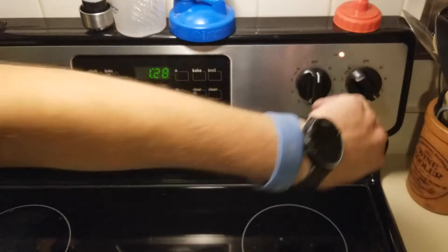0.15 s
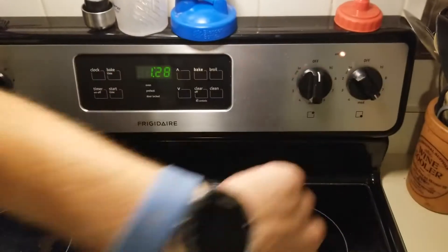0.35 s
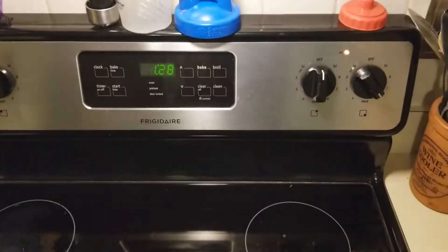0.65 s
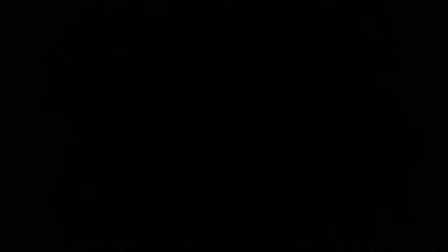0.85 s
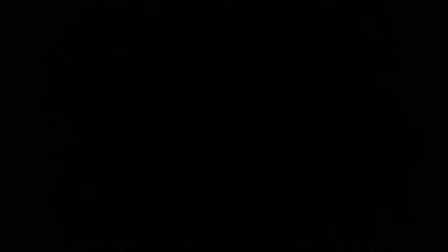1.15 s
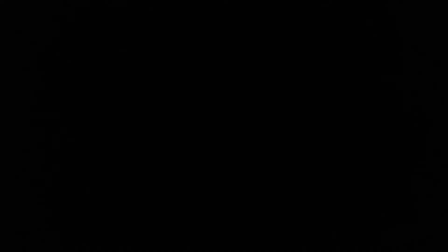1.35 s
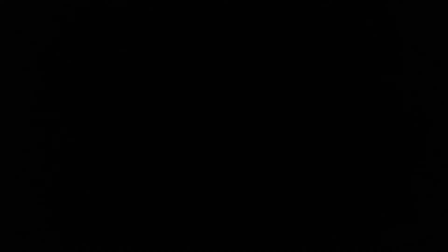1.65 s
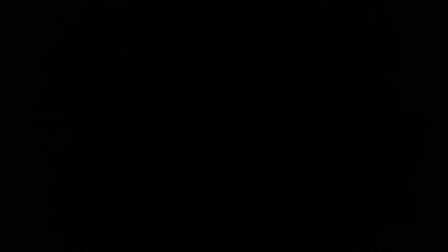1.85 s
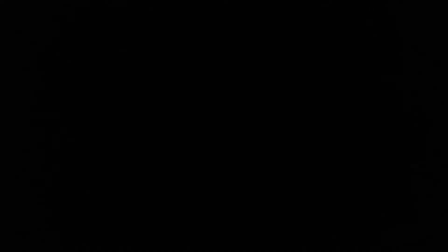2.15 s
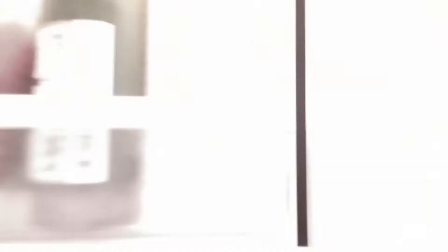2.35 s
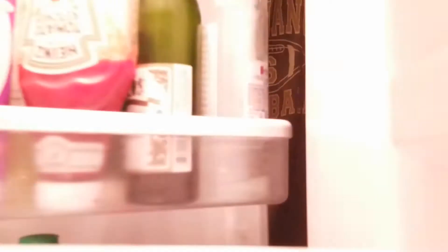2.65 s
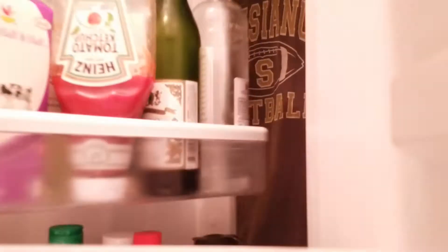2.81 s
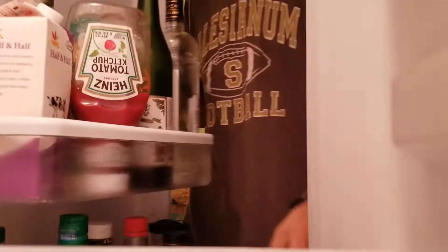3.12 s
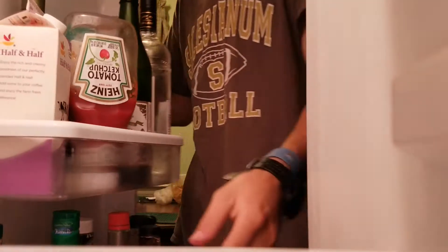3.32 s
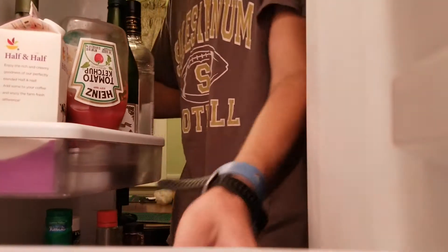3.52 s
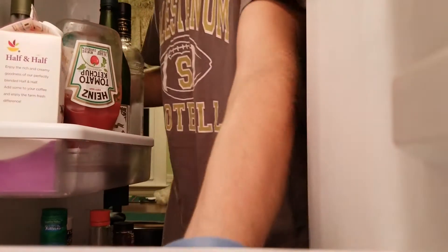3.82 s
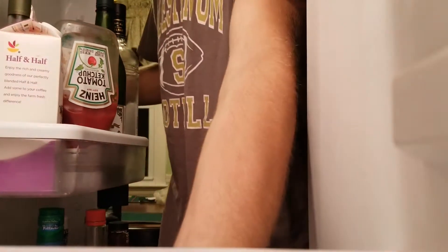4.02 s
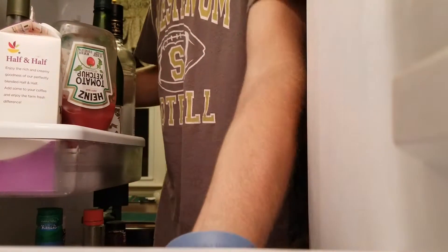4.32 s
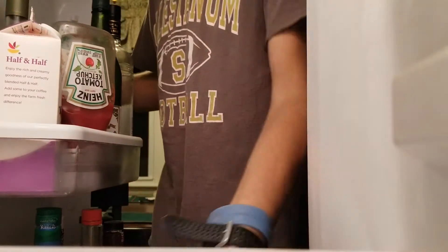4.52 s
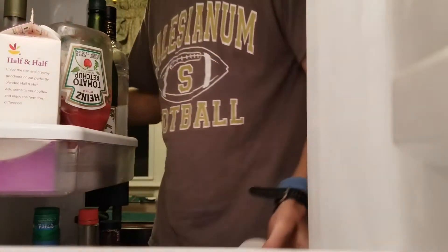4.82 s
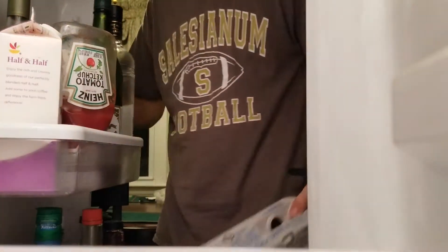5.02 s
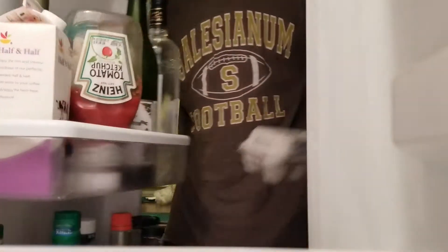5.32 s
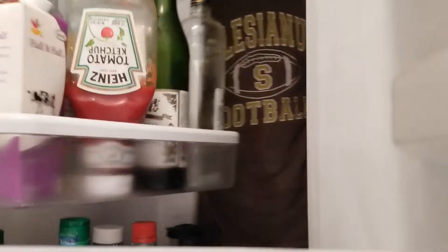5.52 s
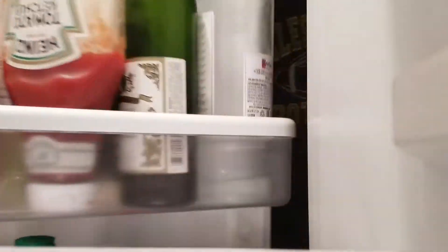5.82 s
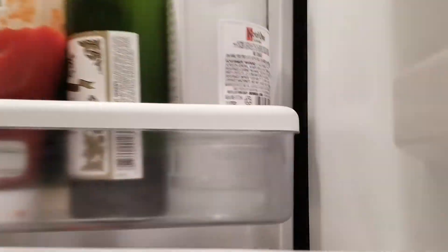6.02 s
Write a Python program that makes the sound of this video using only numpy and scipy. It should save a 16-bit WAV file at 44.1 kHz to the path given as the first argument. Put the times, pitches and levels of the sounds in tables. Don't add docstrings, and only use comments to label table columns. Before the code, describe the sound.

Heard closely from a fridge shelf after a short, quiet kitchen opening: steady compressor hum, fan air and a faint high whine. Muffled knocks build to a heavy door jolt with a dense burst of bottle rattles and bright ticks. Calmer hum follows with sleeve rustle, then a pulp carton knocks, rubs and drags in short pulls, ending in a solid bump. Light nudges precede the closing thud and glassy rattle.

```python
import sys
import numpy as np
from scipy import signal
from scipy.fft import rfft, irfft, next_fast_len
from scipy.io import wavfile
from scipy.ndimage import uniform_filter1d

SR = 44100
rng = np.random.default_rng(int(sys.argv[2]) if len(sys.argv) > 2 else 0)


def rack_gain(trim_db):
    fader = np.asarray(trim_db, float)
    return 10 ** (fader / 20)


def output_pcm(signal):
    pcm = np.clip(np.atleast_2d(signal).T, -1, 1) * 32767
    wavfile.write(sys.argv[1], SR, np.round(pcm).astype(np.int16))


N = 271563
T = np.arange(N) / SR
INSIDE_S = .822
OPEN_S, SHUT_S = 2.38, 6.14
PORT_LAG = 18


def curve(table, hz):
    f, v = np.transpose(table)
    return np.interp(np.log(np.maximum(hz, 1)), np.log(np.maximum(f, 1)), v)


def walk(rate):
    k = int(SR / rate)
    held = np.repeat(rng.standard_normal(N // k + 1), k)
    return 1.2 * uniform_filter1d(uniform_filter1d(held, k), k)[:N]


def pair(alike, lag=0):
    mid, side = rng.standard_normal((2, N))
    a = np.sqrt((1 + alike) / 2) * mid
    b = np.sqrt((1 - alike) / 2) * side
    return np.array([a + b, np.roll(a - b, lag)])


def grit(spread_db, density):
    k = max(int(SR / density), 1)
    grain_db = spread_db * np.minimum(rng.exponential(size=N // k + 1), 2.5)
    g = np.repeat(rack_gain(grain_db), k)[:N]
    return g / np.sqrt(np.mean(g ** 2))


def ring(x, modes, body=0.035):
    size = next_fast_len(N + SR // 2)
    hz = np.fft.rfftfreq(size, 1 / SR) + 1e-3
    h = 0
    for k, (f, width, db) in enumerate(modes):
        pole = 1 / (1 + 1j * (hz / f - f / hz) * f / (2.34 * width))
        h = h + (-1) ** k * rack_gain(db) * pole * (pole + body)
    return irfft(rfft(x, size) * h / np.sqrt(np.mean(abs(h) ** 2)), size)[..., :N]


def moves(rows, mix_db=0):
    out = np.zeros(N)
    for s, attack, hold, release, db in rows:
        ramp = np.minimum((T - s) / attack - 1, (s + attack + hold - T) / release)
        out += (T > s) * rack_gain(db + 25 * np.minimum(ramp, 0)) ** 2
    return rack_gain(np.reshape(mix_db, (-1, 1))) ** 2 * out


def struck(rows, rise_cycles, sag):
    out, t = np.zeros(N + SR), np.arange(SR // 2) / SR
    for s, db, hz, t60 in rows:
        phase = 2 * np.pi * hz * (t + sag * t60 / 8 * (1 - np.exp(-8 * t / t60)))
        envelope = rack_gain(db - 60 * t / t60) * (1 - np.exp(-t * hz / rise_cycles))
        out[int(s * SR):][:len(t)] += envelope * np.sin(phase)
    return out[:N]


def liner(x):
    t60_s, walls_db = .05, -4
    t = np.arange(int(t60_s * SR)) / SR
    walls = rng.standard_normal((2, len(t))) * rack_gain(-60 * t / t60_s) * (t > .001)
    walls *= rack_gain(walls_db) / np.sqrt(np.sum(walls ** 2, axis=1, keepdims=True))
    direct = np.array([x, .9 * np.roll(x, PORT_LAG)])
    reflected = signal.fftconvolve(x[None], walls, axes=1)[:, :N]
    return (direct + reflected) / np.hypot(1, rack_gain(walls_db))


# pitch_hz, likeness (0-1)
ALIKE = [(60, 1), (130, .98), (290, .95), (640, .65), (1400, 0)]


def air(spectrum, db, flicker_db):
    hz, out = np.fft.rfftfreq(N, 1 / SR) + 1e-3, 0
    mid, side = rfft(rng.standard_normal((2, N))) * rack_gain(curve(spectrum, hz))
    c = curve(ALIKE, hz)
    both = np.sqrt(1 + c) * mid + np.sqrt(1 - c) * side * np.array([[1], [-1]])
    for centre in 25 * 2. ** np.arange(10):
        band = np.cos(np.pi / 2 * np.clip(np.log2(hz / centre), -1, 1)) ** 2
        out = out + irfft(both * band, N) * rack_gain(flicker_db * walk(5.2))
    return out * rack_gain(db) / np.sqrt(np.mean(out.mean(axis=0) ** 2))


# pitch_hz, density_db (per Hz)
KITCHEN_AIR = [(20, -32), (45, -8), (62, -5), (90, -17.5), (134, -27), (170, -16.5), (242, -13.5),
               (354, -11.5), (575, -26.5), (1190, -29.5), (1700, -42.5), (4000, -39.5), (8000, -47),
               (16000, -43.5)]
# pitch_hz, density_db (per Hz)
CABINET_AIR = [(20, -30), (48, -12), (74, -1), (94, 6.5), (135, -13.5), (212, 3.5), (363, -17.5),
               (624, -13.5), (1300, -28.5), (2160, -38.5), (3300, -39), (5000, -57), (13600, -44),
               (16000, -50)]


def room_and_fan(inside):
    return (1 - inside) * air(KITCHEN_AIR, -59.5, 1.0) + inside * air(CABINET_AIR, -48, 0.9)


# time_s, level_db
SHAFT_HUM = [(.83, -33), (1.01, -35), (1.56, -32.5), (2.12, -34.5), (2.61, -30), (2.87, -36.5), (3.77, -40),
             (4.47, -39.5), (5.3, -38.5), (5.83, -30), (6.16, -34.5)]
# pitch_hz, kitchen_db, door_shut_db, door_open_db
TONES = [(119.2, -58.5, -84, -48), (162.5, -84, -55.5, -62), (244.8, -66, -56.5, -57.5),
         (295, -81, -64.5, -57), (81.5, -74, -60, -52.5), (474, -82, -65.5, -64)]
SHAFT_HZ, CABINET_HZ = 59.75, 206.3


def compressor(inside):
    def tone(hz, db, waver_db, drift):
        level = np.sqrt(2) * rack_gain(db + waver_db * walk(11))
        return level * np.sin(2 * np.pi * hz * T + drift * walk(5) + 6 * rng.random())

    door = np.clip(np.minimum((T - OPEN_S) / 0.16, (SHUT_S - T) / 0.71), 0, 1)

    def by_place(kitchen, shut, wide):
        return kitchen + (shut - kitchen) * inside + (wide - shut) * door

    kitchen_hum_db = -51.5
    shaft_db = kitchen_hum_db + (np.interp(T, *np.transpose(SHAFT_HUM)) - kitchen_hum_db) * inside
    out = tone(SHAFT_HZ, shaft_db, 0.39, 0.55)
    out += tone(CABINET_HZ, by_place(-72, -44.5, -42.5), 1.35, 0.52)
    for hz, *levels_db in TONES:
        out += tone(hz, by_place(*levels_db), 1.2, .5)
    return out


def coil_whine(inside):
    whine_hz, kitchen_db, cabinet_db = 4571, -75.5, -78
    opened = T > OPEN_S
    db = kitchen_db + (cabinet_db - kitchen_db) * inside - 0.72 * inside
    db = db + 1.5 * (1.5 + opened) * walk(16)
    throb_kitchen, throb_shut, throb_open = 0.14, 0.45, 0.2
    depth = throb_kitchen + (throb_shut - throb_kitchen) * inside + (throb_open - throb_shut) * opened
    depth = depth + 0.13 * inside * walk(6.3)
    turn = np.exp(2j * np.pi * SHAFT_HZ * T + .9j * walk(8.8))
    blur = 1.1 * walk(9) + 1.15 * opened * walk(150)
    carrier = np.exp(2j * np.pi * whine_hz * T + 1j * blur)
    throbbing = carrier * (1 + depth * (turn + 0.58 * turn ** 2 + 0.25 / turn))
    return np.sqrt(2) * rack_gain(db) * np.real(throbbing)


# start_s, attack_s, hold_s, release_s, level_db
SLEEVES = [(-.1, 0.37, .1, 0.52, -77), (1.5, 0.046, 0.017, 0.052, -68.5), (1.95, 0.013, 0.05, 0.049, -51),
           (2.6, 0.031, .1, 0.36, -78), (3.125, 0.0089, .015, 0.04, -69.5),
           (3.17, 0.039, 0.052, 0.12, -73.5), (3.33, 0.046, 0.043, .15, -71), (4.8, .03, .06, 0.28, -76),
           (5.0, 0.12, 0.089, 0.1, -71), (5.283, .004, .008, .04, -68), (5.295, 0.011, 0.025, 0.18, -71),
           (5.7, 0.074, 0.037, 0.13, -72.5)]
# pitch_hz, width_hz, level_db
RUSTLE = [(3900, 930, 1), (5200, 2280, -0.5), (6560, 1010, 5), (7310, 680, -1.5)]


def rustling(crack, rustle):
    cloth = moves(SLEEVES)[0] + (T > INSIDE_S) * rack_gain(-81.5) ** 2
    power = 0.4 * crack + (rustle + cloth) * rack_gain(2.2 * walk(35))
    return rack_gain(3.5) * ring(np.sqrt(power) * grit(2.0, 300) * pair(0.034), RUSTLE)


# pitch_hz, width_hz, level_db
CUFF = [(3560, 620, 7), (6700, 1100, -9)]
# start_s, attack_s, hold_s, release_s, level_db
CUFF_SWISH = [
    (0.203, 0.18, .04, .12, -73),
]


def cuff():
    return ring(np.sqrt(moves(CUFF_SWISH)[0]) * pair(.3), CUFF)


# pitch_hz, width_hz, level_db
DUCT = [(436, 15, 4), (640, 56, -6.5), (1293, 40, -9.5), (1414, 42, -21.5), (1910, 44, -23),
        (2450, 71, -33), (2660, 42, -27.5)]


def duct(inside):
    db = np.where(T < OPEN_S, -57.5, -65) + 1.1 * walk(4)
    return ring(inside * rack_gain(db) * pair(0.7), DUCT)


# start_s, shelf_db, pitch_hz (strongest ring), glass_db, crack_db
DOOR_KNOCKS = [(.829, -41, 670, -63, -82.5), (.996, -23, 421, -62, -87), (1.079, -20, 474, -34, -42),
               (1.151, -38.5, 950, -43, -31.5), (1.522, -24, 547, -58.5, -49.5),
               (1.545, -28, 436, -52, -62.5), (1.799, -38.5, 628, -53, -79),
               (1.946, -23.5, 539, -30.5, -78), (1.959, -16.5, 447, -26, -53),
               (2.035, -25, 1930, -23, -19.5), (2.121, -20, 640, -45, -33), (2.151, -20, 410, -33, -35),
               (2.205, -29.5, 450, -48, -35), (2.213, -20.5, 425, -33.5, -51),
               (2.246, -36, 425, -67, -33.5), (2.316, -26, 830, -33.5, -38),
               (2.334, -25.5, 492, -37.5, -47.5), (2.443, -34.5, 586, -50, -37.5),
               (2.465, -52, 470, -39, -38.5), (5.998, -21.5, 806, -24.5, -32), (6.03, -38, 497, -32, -33)]
# start_s, shelf_db, pitch_hz (strongest ring), glass_db, crack_db
HAND_KNOCKS = [(2.55, -43.5, 710, -60, -84), (2.622, -41, 602, -63, -85), (2.708, -45, 696, -61, -87),
               (3.0, -37.5, 720, -54.5, -67), (3.457, -39.5, 590, -57.5, -73),
               (3.661, -38.5, 442, -49, -44), (3.777, -26, 1116, -41.5, -49), (3.863, -35, 740, -60, -40),
               (3.931, -28, 1150, -43, -49), (4.035, -36.5, 474, -44.5, -46), (4.191, -31, 868, -49, -42.5),
               (4.307, -23.5, 455, -44.5, -50.5), (4.519, -23, 467, -41, -40), (4.556, -30, 282, -62, -67),
               (4.581, -19.5, 542, -55, -64), (5.172, -33.5, 687, -68, -60), (5.585, -40, 618, -71, -86),
               (5.767, -37, 455, -61, -80)]
RATTLE_T60_S = 0.13


def knocks():
    env, t = np.zeros((3, N + SR)), np.arange(SR // 2) / SR
    slower = np.array([[.9], [.9], [.8]])
    rise_s = np.array([[.0008], [.0006], [.0003]])
    snap = np.array([[2.5], [1.5], [.4]])
    for s, shelf_db, hz, glass_db, crack_db in DOOR_KNOCKS + HAND_KNOCKS:
        shelf_t60 = RATTLE_T60_S + 0.0172 * max(-23 - shelf_db, 0)
        t60 = np.array([[shelf_t60], [RATTLE_T60_S], [RATTLE_T60_S]])
        decay = rack_gain(-60 * t / (t60 * slower)) + snap * np.exp(-t / (2.0 * rise_s))
        shape = (1 - np.exp(-t / rise_s)) * decay
        db = np.array([[shelf_db - 8.5], [glass_db - 9.0], [crack_db - 8.5]])
        env[:, int(s * SR):][:, :len(t)] += (rack_gain(db) * shape) ** 2
    return env[:, :N]


# start_s, attack_s, hold_s, release_s, level_db
NUDGES = [
    (.823, 0.003, 0.053, 0.39, -47.5),
    (2.35, .05, 0.28, 0.43, -63),
    (5.13, 0.036, 0.017, 0.35, -46),
    (5.74, 0.039, 0.033, 0.11, -48),
    (2.8, .01, 0.023, 0.07, -55),
]
# from_s, then rows of pitch_hz, width_hz, level_db
SHELF = [
    (0, [(395, 170, -1), (790, 70, 12), (1050, 210, 0.5), (1654, 110, 4.5), (2750, 700, -24)]),
    (.97, [(344, 153, 4.5), (445, 79, 9), (640, 54, 4.5), (786, 54, 2.5), (970, 96, -3), (1210, 340, -9), (1440, 200, -6.5)]),
    (3.6, [(314, 210, -14.5), (464, 23, 4), (639, 23, -6), (771, 24, -1), (920, 91, -13), (1146, 42, -5.5), (1320, 67, -14), (1590, 150, -15.5)]),
    (4.17, [(425, 80, -6), (660, 37, -16), (740, 16, -0.5), (882, 33, 0.5), (1123, 55, -7), (1340, 105, -18)]),
    (4.45, [(370, 240, -15), (486, 41, 2), (645, 35, 2), (803, 89, -3), (978, 16, 4), (1105, 58, 3), (1365, 51, -5), (1684, 93, -12)]),
    (5.0, [(453, 250, 1.5), (637, 49, 5.5), (760, 32, 3), (1060, 54, -17), (1140, 37, 2)]),
]


def shelves(knock, drag, slips):
    murmur = moves(NUDGES)[0] + (T > INSIDE_S) * rack_gain(-59.5) ** 2
    drive = np.sqrt(knock + (drag + murmur) * slips ** 2) * pair(.65, lag=PORT_LAG)
    ends = [s for s, modes in SHELF[1:]] + [N / SR]
    return sum(ring(drive * ((T >= s) & (T < end)), modes) for (s, modes), end in zip(SHELF, ends))


# pitch_hz, width_hz, level_db
GLASS = [(1624, 170, -2), (1953, 98, 2.5), (2075, 190, -5), (2367, 130, -7.5), (2520, 54, -2),
         (2990, 31, -13.5), (3070, 184, 0.5), (4120, 36, -28), (4460, 20, -10), (3104, 830, -5.5)]


def bottles(knock, drag, slips):
    return rack_gain(2.5) * ring(np.sqrt(knock + drag * slips ** 2) * pair(0.072, lag=PORT_LAG), GLASS)


# pitch_hz, width_hz, level_db
HISS = [(10350, 3600, -2), (12460, 1230, 4), (13700, 1200, -1.5)]


def contact_hiss(crack, hiss):
    bright = np.where((T > 1.9) & (T < 5.9), .4, .03)
    power = bright * crack + hiss * rack_gain(4.8 * walk(30))
    return ring(np.sqrt(power) * grit(2.1, 300) * pair(0.098), HISS)


# start_s, attack_s, hold_s, release_s, level_db
SHUDDERS = [
    (.83, 0.065, 0.31, 0.26, -44),
    (1.45, 0.087, 0.014, 0.14, -34.5),
    (1.9, 0.085, 0.023, 0.29, -24),
    (2.0, 0.11, 0.066, 0.85, -32),
    (4.47, 0.031, 0.048, 0.23, -37.5),
    (5.93, 0.057, .01, 0.37, -35),
]
# start_s, attack_s, hold_s, release_s, level_db
SWAYS = [
    (1.88, 0.13, 0.3, 0.34, -30),
    (5.6, 0.31, .3, .2, -46.5),
]
# pitch_hz, width_hz, level_db
BOX = [(75, 31.6, -7), (102, 24, -9.5), (150, 114, -11.5), (234.4, 59, -7.5)]


def box_boom():
    inside = T > INSIDE_S
    boom = np.sqrt(moves(SHUDDERS)[0] + inside * rack_gain(-47.5) ** 2)
    slow = np.sqrt(moves(SWAYS)[0] + inside * rack_gain(-57) ** 2)
    return ring(boom * pair(0.9), BOX) + ring(slow * pair(1), [(52.5, 25.0, 0)])


# start_s, peak_db, pitch_hz,
# t60_s
CLINKS = [(1.08, -30, 1974, 0.032), (1.519, -31.5, 1100, 0.13), (1.523, -54, 2510, 0.098),
          (1.957, -28.5, 1950, 0.067), (1.957, -27.5, 2290, 0.056), (3.003, -59, 2180, .04),
          (3.46, -58, 2010, 0.058), (5.9, -40, 1300, 0.084), (2.113, -28.5, 1700, 0.07),
          (2.116, -17.5, 1672, 0.048), (2.13, -16.5, 1340, 0.033), (2.135, -24.5, 956, 0.083),
          (2.316, -31.5, 2130, 0.025), (2.316, -26, 530, .06), (2.09, -36, 2200, 0.065),
          (2.017, -19, 1020, 0.032), (2.028, -19.5, 1240, 0.032), (2.037, -24.5, 1940, 0.046),
          (2.13, -20.5, 530, 0.065), (2.04, -30, 3300, 0.041), (2.04, -35, 2600, 0.044),
          (2.155, -42, 2520, 0.062), (1.2, -34, 800, .05), (5.997, -30.5, 3100, .04),
          (5.998, -33, 1950, 0.029),
          (2.545, -58, 2030, .04), (2.645, -45, 1150, 0.062), (2.705, -58, 2080, .035),
                (3.006, -60, 1950, .05), (5.18, -38, 552, 0.14), (5.6, -49, 660, 0.068),
                (5.805, -41.5, 970, 0.084), (4.583, -24, 894, 0.071), (4.595, -24, 481, .1),
                (4.59, -31, 640, 0.1), (1.53, -35, 1120, 0.058), (1.8, -43, 1000, 0.057),
                (2.11, -27.5, 1076, 0.09), (2.17, -32, 800, 0.13), (4.9, -48, 118.8, 3),
                (4.6, -36, 120, 0.14), (2.1, -36, 1600, 0.056), (2.14, -30, 1470, .05),
                (2.16, -27, 1280, 0.053), (3.655, -45.5, 6400, 0.032), (3.945, -31, 1120, 0.11),
                (4.193, -47, 3900, 0.044), (4.31, -54, 3000, 0.036), (1.152, -37, 990, 0.041),
                (1.152, -43.5, 2387, 0.043), (1.152, -39, 3500, .06), (1.154, -46, 3020, .08),
                (1.08, -36, 2230, 0.049), (1.08, -29.5, 750, 0.057), (1.08, -42, 2670, 0.055),
                (2.208, -26, 1284, 0.09), (2.223, -24, 1157, 0.047), (3.78, -36, 630, 0.12),
                (4.035, -25, 1110, 0.06), (4.04, -32, 470, 0.084), (4.05, -37, 760, 0.057),
                (4.195, -44, 1900, .05), (4.2, -38, 1400, .06), (4.555, -28, 460, .07),
                (4.307, -25.5, 900, 0.045), (2.04, -35, 3900, 0.04), (2.04, -37, 2900, 0.044),
                (2.155, -42, 2480, .07), (4.309, -43.5, 2100, 0.057), (5.999, -24, 2374, 0.039),
                (5.999, -22, 1380, 0.044), (6.0, -21.5, 700, 0.051), (5.997, -34, 3100, 0.032),
                (5.998, -33, 1950, .04)]


def clinks():
    blows = [(s, db - 2.0, hz, 0.59 * RATTLE_T60_S) for s, db, hz, _, _ in DOOR_KNOCKS + HAND_KNOCKS]
    rings = struck(blows, rise_cycles=0.34, sag=0.0065)
    rings += struck(CLINKS, rise_cycles=0.2, sag=0.017)
    return liner(rings * rack_gain(1.8 * walk(300)))


# start_s, peak_db, pitch_hz, t60_s
THUDS = [(.995, -20.5, 226, 0.12), (1.078, -21.5, 278, 0.032), (1.548, -20, 105, 0.092),
         (1.797, -22.5, 210, 0.14), (1.946, -15, 222, 0.13), (2.027, -7.5, 73.5, 0.09),
         (2.12, -16.5, 103.4, 0.18), (2.21, -16.5, 189, 0.073), (2.28, -24, 98.3, 0.12),
         (2.365, -23, 228, 0.054), (3.695, -28.5, 252, 0.17), (3.78, -30, 239, 0.17),
         (4.555, -28.5, 250, 0.062), (4.524, -9.5, 146, 0.026), (4.532, -21.5, 114, 0.1),
         (6.002, -14, 80.5, 0.18), (6.033, -21.5, 218, 0.074)]


def thuds():
    return struck(THUDS, rise_cycles=0.16, sag=0.02)


# start_s, attack_s, hold_s, release_s, level_db
SWINGS = [
    (1.94, 0.02, 0.1, 0.035, -40.5),
    (1.98, 0.039, 0.011, 0.085, -34.5),
    (2.07, 0.037, 0.067, 0.12, -36.5),
    (2.2, 0.0074, 0.029, 0.12, -47.5),
    (2.3, 0.046, 0.039, 0.092, -47),
    (5.98, 0.022, 0.009, 0.059, -32.5),
]
# start_s, attack_s, hold_s, release_s, level_db
BRUSHES = [(3.655, 0.027, 0.073, 0.066, -53), (3.75, 0.029, 0.035, .03, -49.5),
           (3.815, 0.0093, 0.024, 0.018, -50.5), (3.863, .002, 0.009, 0.1, -47),
           (3.93, 0.094, 0.09, 0.15, -49.5), (4.19, 0.004, 0.078, 0.044, -52.5),
           (4.3, 0.053, 0.15, .03, -60.5), (1.99, 0.01, 0.034, .02, -43.5), (4.516, .003, 0.027, 0.03, -54),
           (1.945, 0.022, .03, .05, -56), (2.153, .002, .02, 0.077, -52), (4.08, .02, 0.034, .05, -54.5),
           (4.58, 0.1, 0.059, 0.083, -56), (4.775, .006, 0.014, 0.089, -69)]
# start_s, attack_s, hold_s, release_s, level_db
SCRAPES = [
    (3.65, 0.01, 0.14, 0.21, -43.5),
    (3.93, 0.011, 0.079, 0.069, -46),
    (4.185, 0.0055, 0.07, 0.061, -40),
    (4.512, 0.0022, 0.12, 0.12, -44.5),
    (4.59, 0.06, 0.12, 0.15, -40.5),
]


def dragging():
    swings = moves(SWINGS, (4, -10, -26, -50))
    brushes = moves(BRUSHES, (-22, -9.5, -11.5, -4))
    return moves(SCRAPES, (2, -13, -18, -20.5)) + brushes + swings


def handling():
    shelf, glass, crack = knocks()
    drag_shelf, drag_glass, rustle, hiss = dragging()
    slips = grit(2.6, 150)
    out = rustling(crack, rustle) + shelves(shelf, drag_shelf, slips) + bottles(glass, drag_glass, slips)
    return out + contact_hiss(crack, hiss) + box_boom() + clinks() + thuds()


def chime(hits, modes):
    chance = rng.standard_normal((2, len(hits), len(modes)))
    rows = []
    for (s, db), level_luck, pitch_luck in zip(hits, *chance):
        for (hz, mode_db, t60), a, b in zip(modes, level_luck, pitch_luck):
            rows.append((s, db + mode_db + 2.7 * a, hz * (1 + .004 * b), t60))
    return liner(struck(rows, rise_cycles=.6, sag=0.002) * rack_gain(2.8 * walk(350)))


# pitch_hz, level_db, t60_s
CAP = [(5750, -6.5, 0.026), (6160, -4, .05), (6250, -7, 0.033), (7000, -9.5, 0.021), (10660, -15, 0.025),
       (13600, -10, 0.032), (14300, -13, .015), (14800, -17, .015), (13100, -19, .015), (5400, -22, .02),
       (15500, -14, 0.022)]
# start_s, peak_db
CAP_HITS = [
    (2.121, -31),
    (2.204, -27),
    (2.245, -25),
    (2.443, -33),
]


def cap():
    return chime(CAP_HITS, CAP)


# pitch_hz, level_db, t60_s
JAR = [(2590, -7, 0.069), (3130, -12.5, 0.099), (3340, -6, .12), (5170, -2.5, 0.096), (7250, -11.5, 0.092),
       (9600, -15, 0.12), (10600, -8, 0.09), (11450, -10, .07), (12100, -11, .09), (13400, -18, .08)]
# start_s, peak_db
JAR_HITS = [
    (2.153, -38),
    (2.316, -42),
    (2.335, -49),
    (2.352, -50),
]


def jar():
    return chime(JAR_HITS, JAR)


# pitch_hz, width_hz, level_db
RAIL = [(7160, 350, 3), (3300, 250, -2), (12400, 900, -5), (10600, 600, -7)]
# start_s, attack_s, hold_s, release_s, level_db
RAIL_RUBS = [
    (4.403, 0.0036, 0.011, 0.034, -58),
    (4.44, .003, .02, .04, -60),
    (4.466, .004, 0.018, .05, -57),
]


def rail():
    return ring(np.sqrt(moves(RAIL_RUBS)[0]) * grit(1.9, 600) * pair(.1), RAIL)


def scene():
    inside = np.clip((T - INSIDE_S) / 0.0074, 0, 1)
    running = room_and_fan(inside) + compressor(inside) + coil_whine(inside) + duct(inside)
    return running + cuff() + handling() + cap() + jar() + rail()


def roll_off(x):
    return signal.sosfilt(signal.butter(12, 16670, fs=SR, output="sos"), x)


# pitch_hz, level_db
KITCHEN_LEFT_MORE = [(60, -.5), (380, 0), (700, -8), (1290, -11), (2380, -4), (4400, -13), (8120, -6),
                     (15000, 0)]
# pitch_hz, level_db
CABINET_LEFT_MORE = [(600, 0), (1290, 1.5), (2380, 4), (4400, 9), (7000, 7.5), (9300, 1.5), (12000, 6)]


def record(dry):
    edge = SR // 8
    wide = np.pad(dry, ((0, 0), (edge, edge)), "reflect", reflect_type="odd")
    hz = np.fft.rfftfreq(wide.shape[1], 1 / SR)
    top = 1 / (1 + (hz / 15900) ** 90)

    def ports(left_more):
        half = rack_gain(curve(left_more, hz) / 2)
        gain = np.array([half, 1 / half])
        shaded = rfft(wide) * top * gain / gain.mean(axis=0)
        return irfft(shaded, wide.shape[1])[:, edge:][:, :N]

    heard = np.where(T < INSIDE_S, ports(KITCHEN_LEFT_MORE), ports(CABINET_LEFT_MORE))
    headroom = .8
    return roll_off(headroom * np.tanh(heard / headroom))


dry = scene()
out = record(dry)
output_pcm(out)
```